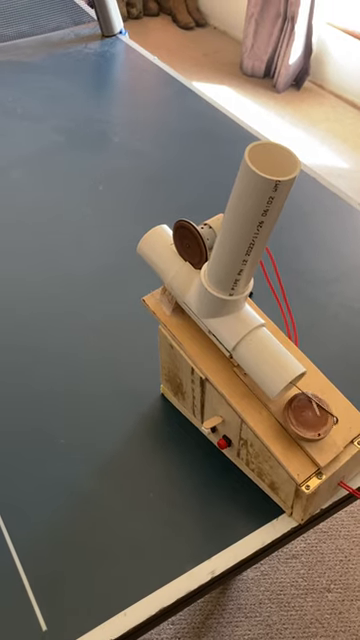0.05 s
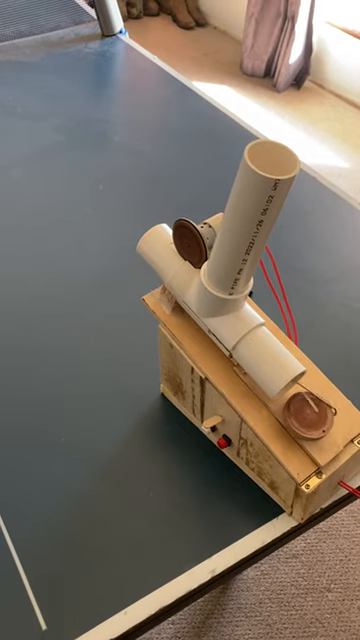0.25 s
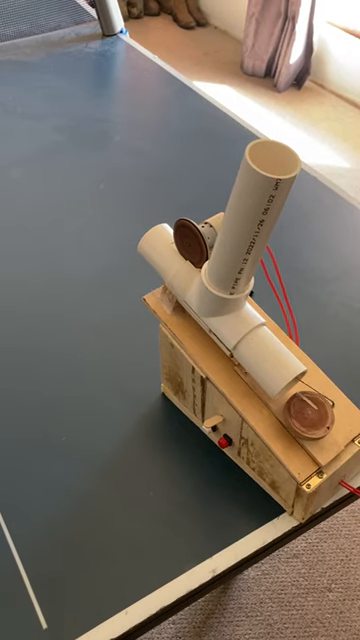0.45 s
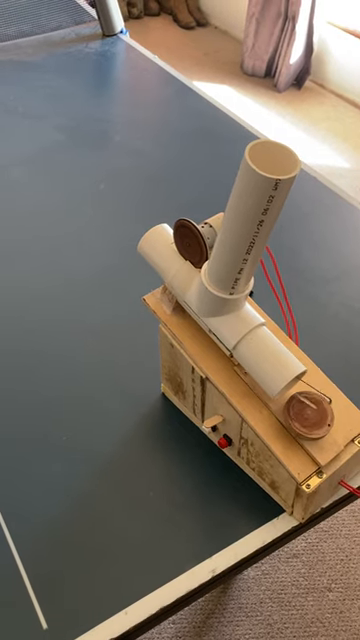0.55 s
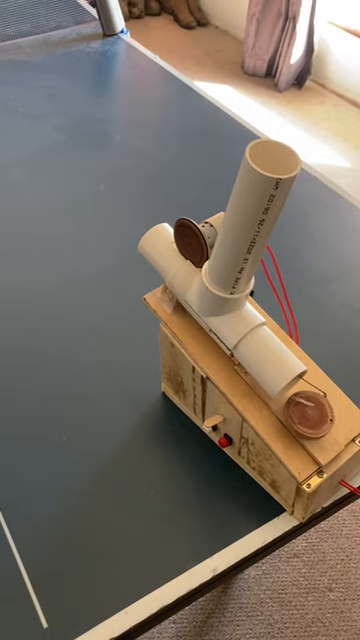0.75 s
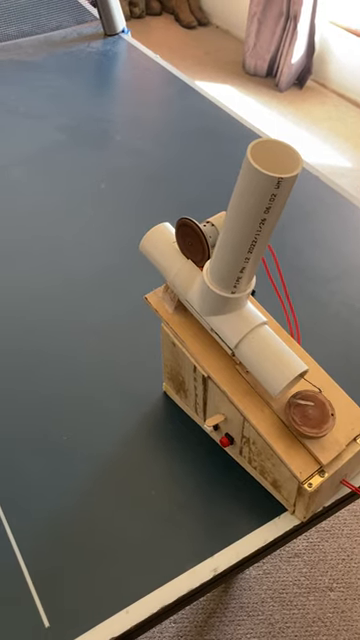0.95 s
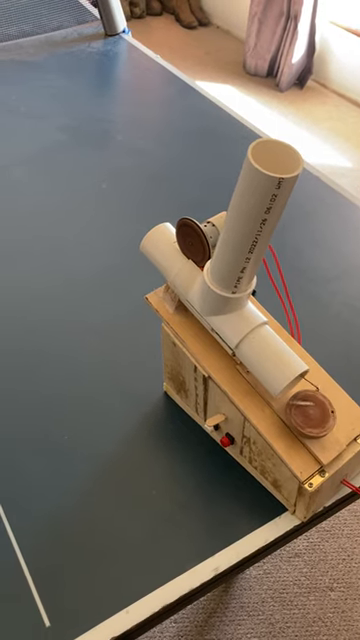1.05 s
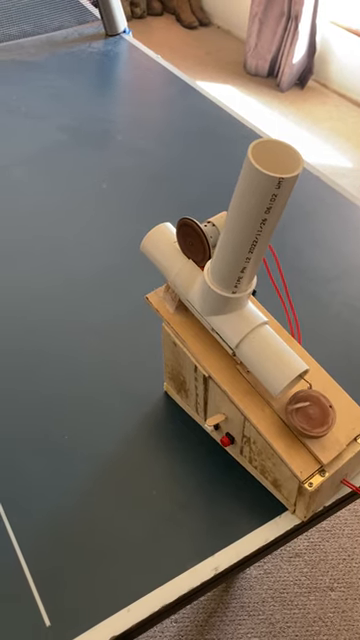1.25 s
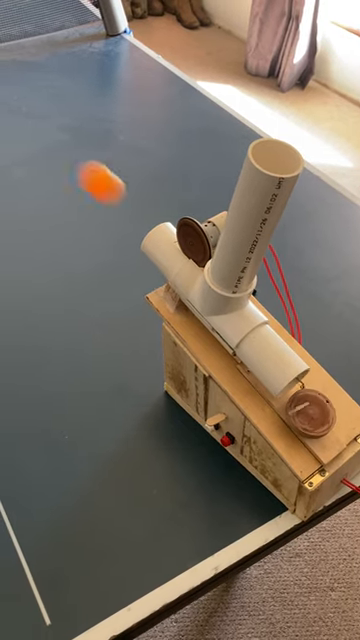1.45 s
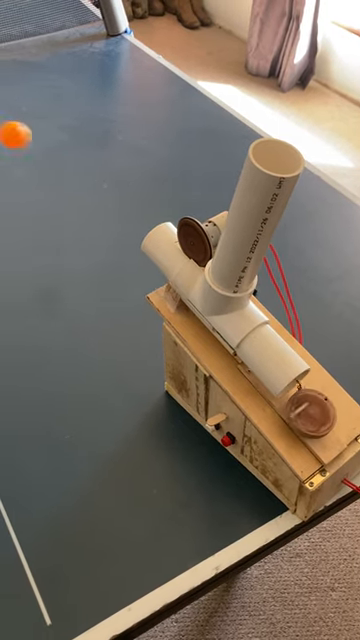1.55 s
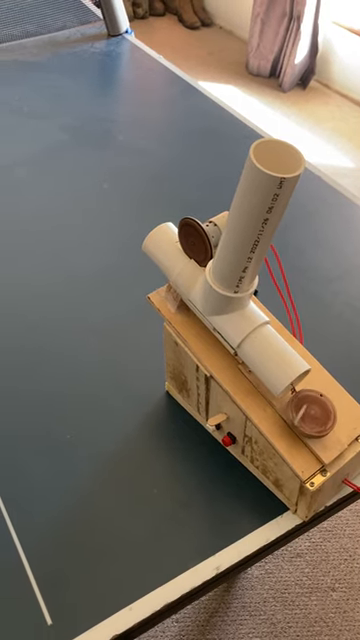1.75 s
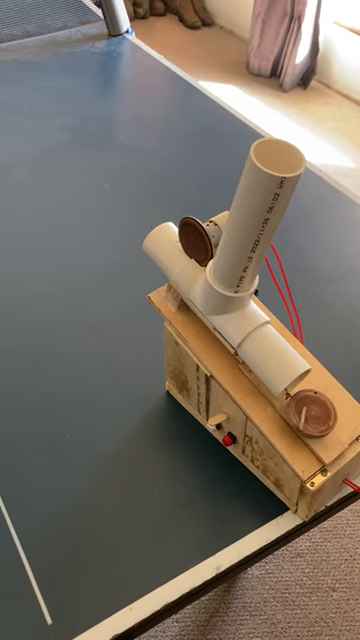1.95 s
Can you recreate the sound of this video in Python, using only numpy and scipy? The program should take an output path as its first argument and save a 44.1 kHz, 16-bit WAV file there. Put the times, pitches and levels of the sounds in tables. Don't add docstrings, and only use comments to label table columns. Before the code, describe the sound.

A small ball launcher's electric motor whirs steadily, then a loud pop and a table bounce.

```python
import sys
import numpy as np
from scipy import signal
from scipy.fft import rfft, irfft, next_fast_len
from scipy.io import wavfile
from scipy.ndimage import map_coordinates

SR = 44100
rng = np.random.default_rng(int(sys.argv[2]) if len(sys.argv) > 2 else 0)


def field_ratio(decibels):
    return 10 ** (np.asarray(decibels, dtype=float) / 20)


def wav_out(sig):
    wavfile.write(sys.argv[1], SR, np.round(np.clip(np.atleast_2d(sig).T, -1, 1) * 32767).astype(np.int16))


N = 88200
TOP_HZ = 15850
FREE_HZ = 117.5


def unit(x):
    return x / np.sqrt(np.mean(x ** 2) + 1e-20)


def along(points, hz):
    f, v = np.transpose(points)
    return np.interp(np.log(hz + 1), np.log(f + 1), v)


def wobble(rate_hz, size):
    knots = rng.standard_normal((size, int(N * rate_hz / SR) + 4))
    at = np.arange(N) * rate_hz / SR
    return np.array([map_coordinates(k, [at]) for k in knots])


def filtered(x, response):
    n = x.shape[-1]
    m = next_fast_len(n + SR // 2)
    return irfft(rfft(x, m) * response(np.fft.rfftfreq(m, 1 / SR)), m)[..., :n]


def resonances(peaks):
    def response(f):
        total = 0
        for k, (centre, width, db) in enumerate(peaks):
            damping = 1j * f * width
            total = total + (-1) ** k * field_ratio(db) * damping / (centre * centre - f * f + damping)
        return total
    return response


def diffuse(size):
    # f/Hz, likeness/1
    alike = [(30, 0.75), (100, 1), (300, 0.99), (750, 0.023), (2000, 0.56), (3500, 0.54), (5500, 0.62),
             (8000, 0.97)]

    def mid_side(hz):
        angle = np.arccos(np.clip(along(alike, hz), -1, 1)) / 2
        return [np.cos(angle), np.sin(angle)]
    mid, side = filtered(rng.standard_normal((2, size)), mid_side)
    return np.array([mid + side, mid - side])


def coloured(size, colour):
    return unit(filtered(diffuse(size), lambda hz: field_ratio(along(colour, hz))))


def swell(s, rise_s, t60_s):
    t = np.maximum(np.arange(N) / SR - s, 0)
    return np.minimum(t / rise_s, 1) ** 2 * field_ratio(-60 * np.maximum(t - rise_s, 0) / t60_s)


def struck(s, db, rise_s, modes):
    hz, level_db, t60_s = np.transpose(modes)[..., None]
    t = np.arange(SR // 4) / SR
    decay_db = -60 * np.maximum(t - rise_s, 0) / t60_s
    shape = np.minimum(t / rise_s, 1) ** 2 * field_ratio(db + level_db + decay_db)
    ring = shape * np.sin(2 * np.pi * (hz * t + rng.random(hz.shape)))
    out = np.zeros(N + SR)
    out[round(s * SR):][:len(t)] = np.sum(ring, 0)
    return out[:N]


def crack(s, db, rise_s, t60_s, colour):
    burst, first = np.zeros((2, N + SR)), round(s * SR)
    burst[:, first:first + SR // 8] = coloured(SR // 8, colour)
    return field_ratio(db) * swell(s, rise_s, t60_s) * burst[:, :N]


def room(x, wet_db):
    # f/Hz, t60/s
    decay = [(150, 0.71), (400, 0.7), (1000, 0.32), (2000, 0.42), (5000, 0.074), (10000, 0.069)]
    hz, t, z = signal.stft(diffuse(SR // 2), SR, nperseg=256)
    z = z * field_ratio(-60 * t / along(decay, hz)[:, None])
    tail = signal.istft(z, SR, nperseg=256)[1]
    tail = tail / np.linalg.norm(tail[0])
    padded = np.pad(np.atleast_2d(x), ((0, 0), (300, 0)))
    return x + field_ratio(wet_db) * signal.fftconvolve(padded, tail, axes=1)[:, :N]


def air():
    # f/Hz, density/dB per Hz
    colour = [(25, -19), (65, 12.5), (200, -0.5), (1200, -2.5), (2500, -8), (4500, -10), (6500, -12.5),
              (9000, -11), (15500, -38)]
    hiss = unit(filtered(diffuse(N), lambda hz: field_ratio(along(colour, hz)) * (hz < TOP_HZ)))
    return field_ratio(-50 + wobble(9.3, size=1)) * hiss


def boards():
    # f/Hz, density/dB per Hz
    colour = [(76, -45), (130, -4.5), (290, -5.5), (428, -6), (510, -15), (810, -6.5), (2020, -21),
              (2700, -38), (3400, -33.5), (5000, -38), (7000, -67)]
    # t/s, level/dB, rise/s, t60/s
    knocks = [
        (0.196, -23, 0.013, 0.57),
        (0.461, -39, 0.0065, 0.69),
        (.5, -68, 0.0072, 0.48),
        (0.551, -38.5, 0.0094, 0.18),
        (.6, -49, 0.01, 0.21),
        (0.706, -43, 0.0051, 0.084),
        (0.851, -54, 0.0036, 0.3),
        (1.421, -41, 0.0084, 0.45),
        (1.699, -30.5, 0.0077, 0.46),
    ]
    # t/s, level/dB, rise/s
    thumps = [
        (.49, -42, 0.0079),
        (0.554, -42.5, .01),
        (0.597, -36.5, 0.0064),
        (0.658, -46.5, 0.0069),
    ]
    # f/Hz, level/dB, t60/s
    modes = [(187.6, 0, 0.16), (245.7, -6, 0.2), (291.5, 0.5, 0.19), (347.6, -6, 0.21), (444.5, -14, .2),
             (793, -6, 0.16), (946, -7, 0.15), (1339, -7, 0.093)]
    shape = sum(field_ratio(db) * swell(s, rise_s, t60_s) for s, db, rise_s, t60_s in knocks)
    rumble = shape * field_ratio(0.95 * wobble(69.2, size=1)) * coloured(N, colour)
    thud = struck(0.209, -21.5, 0.013, modes)
    low = sum(struck(*thump, modes[:3]) for thump in thumps)
    return rumble + room(thud + low, wet_db=-12)


def loose_ball():
    # t/s, level/dB
    contacts = [(.201, -45), (.461, -44), (.504, -45), (.54, -52), (.562, -50), (.573, -52), (.707, -45),
                (.75, -52), (.852, -48), (.963, -49), (1.07, -53)]
    # f/Hz, level/dB, t60/s
    shell = [(7970, -4.5, 0.071), (8350, 1, 0.086), (9400, -3, 0.03), (9800, 3.5, .025),
             (10490, 5.5, 0.046)]
    # f/Hz, density/dB per Hz
    colour = [(500, -10), (1200, 4), (3000, -10), (6000, -10), (8400, 1), (10500, -3), (12500, -23),
              (14500, -40)]
    # f/Hz, level/dB, t60/s
    tick_modes = [(6800, 6.5, 0.026), (6330, 2, 0.023), (7200, -9, .012)]
    out = struck(1.904, -43.5, 0.003, tick_modes)
    for s, db in contacts:
        out = out + struck(s, db - 0.5, 0.0017, shell) + crack(s, db - 1, 0.0024, 0.058, colour)
    return room(out, wet_db=-1)


def shimmer():
    # t/s, level/dB, t60/s
    tails = [
        (1.414, -40, 0.62),
        (1.698, -42.5, 0.57),
    ]
    # f/Hz, density/dB per Hz
    colour = [(2500, 2.5), (4500, -3), (8700, 4.5), (11000, 1), (16000, -17)]
    shape = sum(field_ratio(db) * swell(s, 0.0033, t60_s) for s, db, t60_s in tails)
    band = lambda hz: field_ratio(along(colour, hz)) * (hz > 2000) * (hz < TOP_HZ)
    return shape * unit(filtered(diffuse(N), band))


def shaft_speed(t):
    start_hz, gripped_hz = 114.2, 110.8
    recover_s, grip_s, slow_s = 1.37, 1.408, 0.012
    before = FREE_HZ - (FREE_HZ - start_hz) * np.exp(-t / recover_s)
    after = FREE_HZ - (FREE_HZ - gripped_hz) * np.exp(-(t - grip_s) / recover_s)
    return before + (after - before) * np.clip((t - grip_s) / slow_s, 0, 1)


def motor():
    speeds = [112.6, 114.5, 116.2]
    # order/1, level/dB at each of the three speeds, phase between ports/rad
    loud_orders = [(5, -70, -60, -61, -0.8), (10, -65, -64, -65, -0.3), (19, -73, -67, -65, 0.0),
                   (20, -58, -57, -71, -0.8), (21, -64, -64, -67, 0.8), (25, -65, -62, -62, -0.5),
                   (30, -64, -63, -64, 0.1), (35, -64, -63, -68, 0.3), (39, -69, -64, -66, -0.5),
                   (40, -66, -66, -63, -0.4), (42, -69, -65, -63, 0.0), (43, -83, -63, -60, 0.3),
                   (44, -66, -64, -57, 0.1), (45, -50, -57, -56, 0.1), (46, -62, -55, -56, -0.1),
                   (47, -62, -60, -60, -0.2), (49, -61, -64, -62, -0.1), (50, -57, -54, -51, -0.2),
                   (51, -63, -63, -60, -0.3), (53, -77, -65, -60, 0.1), (55, -56, -58, -57, 0.0),
                   (56, -56, -56, -60, 0.1), (60, -80, -64, -62, -0.1), (70, -79, -65, -58, -0.4),
                   (72, -79, -65, -61, 0.0), (74, -65, -65, -71, -0.1), (80, -65, -66, -67, 0.1),
                   (81, -73, -64, -66, 0.0), (83, -64, -69, -74, 0.0), (104, -67, -66, -66, 0.1),
                   (107, -67, -66, -63, 0.1), (108, -75, -70, -64, -0.1), (110, -70, -66, -61, -0.1),
                   (112, -67, -66, -65, 0.0), (114, -69, -63, -64, 0.0), (115, -80, -68, -67, -0.1),
                   (116, -63, -68, -70, 0.0), (120, -73, -66, -66, -0.1), (122, -67, -65, -67, -0.1),
                   (123, -61, -65, -65, -0.1)]
    # f/Hz, level/dB
    other_orders = [(200, -61.5), (800, -82.5), (3600, -74), (5500, -69.5), (7200, -74), (10000, -73.5),
                    (13000, -73.5), (15600, -76.5)]
    # f/Hz, phase/rad
    skew_scatter = [(300, 0), (1500, .6), (3000, .3), (4500, .2), (6500, .1), (8000, 0)]
    lead = SR // 2
    speed = shaft_speed(np.arange(-lead, N) / SR)
    turn = 2 * np.pi * np.cumsum(speed) / SR
    box = resonances([(116.12, 3.4, -35)])
    hum = filtered(np.sin(turn), box)[lead:]

    speed = speed[lead:]
    turn = turn[lead:] + 0.012 * wobble(25, size=1)[0]
    orders = np.arange(2, 136)
    count = len(orders)
    usual_db = along(other_orders, orders * speed.mean()) + 4 * rng.standard_normal(count)
    level_db = usual_db[:, None] + 0 * speed
    start = 1.12 * rng.standard_normal(count)
    skew = along(skew_scatter, orders * FREE_HZ) * rng.standard_normal(count)
    for order, *row_db, phase in loud_orders:
        i = int(order) - orders[0]
        level_db[i] = np.interp(speed, speeds, row_db)
        skew[i] = phase
    partials = field_ratio(level_db) * np.exp(1j * orders[:, None] * turn)

    drift_db = 4 * wobble(7, size=16)
    wander = 0.6 * wobble(5, size=16) * np.reshape([-.5, .5], (2, 1, 1))
    family = orders % 16 == np.arange(16)[:, None]
    port_phase = start + np.outer([-.5, .5], skew)
    groups = (family * np.exp(1j * port_phase)[:, None]) @ partials
    whir = np.sum(groups * field_ratio(drift_db) * np.exp(1j * wander), 1).imag

    whine_amp = field_ratio(-58.5 + 1.25 * wobble(12.3, size=1)[0])
    whine = whine_amp * np.sin(2 * np.pi * 1960.6 * np.arange(N) / SR)
    return np.sqrt(2) * (hum + whir + whine)


def landing():
    # f/Hz, level/dB, t60/s
    ball = [(798, -6.5, 0.03), (1705, -2.5, .03), (4240, -13, 0.021), (4480, -24, 0.02), (4900, -14, 0.016),
            (5900, -20, .012), (8930, -10, 0.025)]
    # f/Hz, level/dB, t60/s
    top = [(317.3, -1, 0.043), (537, -8, 0.056), (990, -14, 0.04)]
    # f/Hz, density/dB per Hz
    colour = [(1500, -8), (3000, 1), (4600, 8.5), (6500, -11), (9500, 9), (13000, 5.5), (16000, -8)]
    bounce_s = 1.6975
    ring = struck(bounce_s, -21.5, 0.0012, ball)
    flex = struck(1.6995, -22, 0.0028, top)
    return room(ring + flex + crack(bounce_s, -18, 0.00093, 0.017, colour), wet_db=-7)


def launch():
    # f/Hz, level/dB, t60/s
    pipe = [(934, 0, 0.021), (1096, -3.5, 0.012), (1230, -7, 0.012), (1648, 0.5, 0.014),
            (2300, -8.5, 0.026), (2590, -7.5, 0.026), (3800, -19.5, .015), (5010, -29, .015)]
    # f/Hz, width/Hz, level/dB
    pipe_song = [(350, 53, 0.5), (933, 110, 5), (1300, 180, -1), (1686, 120, 6), (2320, 66, -9.5)]
    # f/Hz, density/dB per Hz
    colour = [(2000, -45), (3200, -3), (4800, -3), (6200, -5), (7700, 6), (9800, 10), (11700, 5),
              (13400, 3), (15000, -8), (16400, -20)]
    pop_s, snap_db = 1.4108, -16
    tones = resonances(pipe_song)
    rub = unit(filtered(rng.standard_normal(N), tones))
    drag = field_ratio(-39.5 + 7.5) * swell(1.4, 0.0064, 0.05) * rub
    pop = struck(pop_s, -8, 0.0053, pipe)
    snap = crack(pop_s + 0.001, snap_db, 0.0033, 0.031, colour)
    wall = crack(pop_s + 0.031, snap_db - 14, 0.003, 0.044, colour)
    song = unit(filtered(diffuse(N), tones)) * field_ratio(-33 + 5.6 * wobble(40, size=2))
    return room(pop + drag + snap + wall, wet_db=-24) + swell(pop_s, 0.008, 0.59) * song


def scene():
    return air() + boards() + loose_ball() + shimmer() + motor() + landing() + launch()


def top_cut(x):
    return signal.sosfilt(signal.butter(12, 16480, fs=SR, output="sos"), x)


def record(dry):
    # f/Hz, phase/rad
    port_turn = [(500, 0), (1200, 1.7), (2700, -3.1), (4000, -3.6), (4650, -9.2), (5400, -9.4),
                 (15000, -18.85)]
    # f/Hz, level/dB
    port_tilt = [(60, 2), (500, 2), (900, 1), (2300, -3), (4400, 0)]
    half = np.array([[-.5], [.5]])

    def ports(hz):
        phase = half * np.interp(hz, *np.transpose(port_turn))
        return np.exp(1j * phase) * field_ratio(-half * along(port_tilt, hz))
    wet = filtered(dry, ports)
    wet = wet / (1 + np.abs(wet / 0.95) ** 6) ** (1 / 6)
    return top_cut(filtered(wet, lambda hz: hz < 16450))


dry = scene()
out = record(dry)
wav_out(out)
```